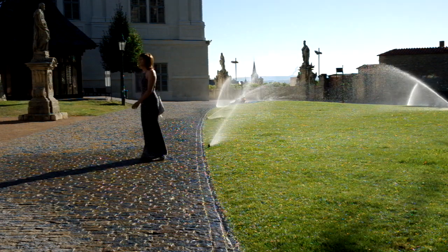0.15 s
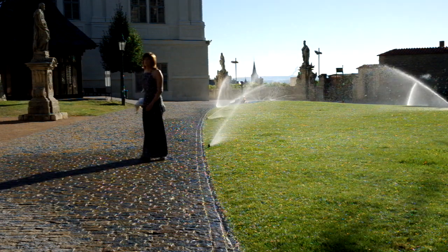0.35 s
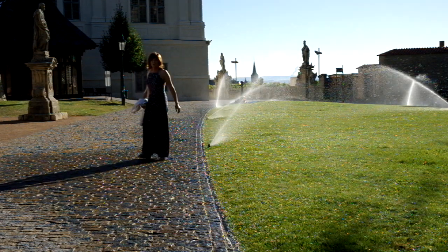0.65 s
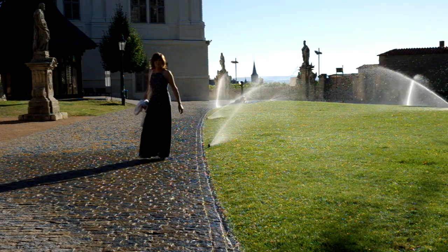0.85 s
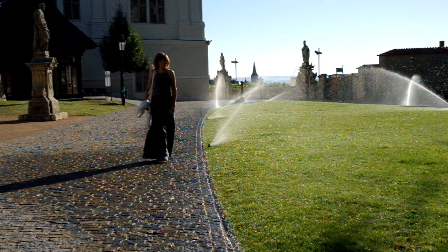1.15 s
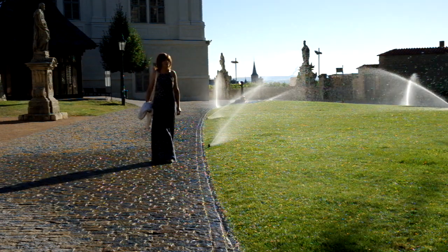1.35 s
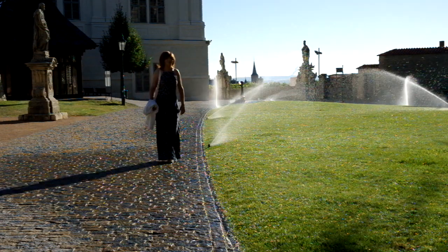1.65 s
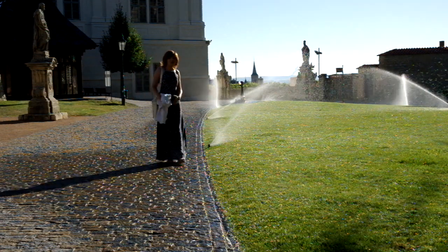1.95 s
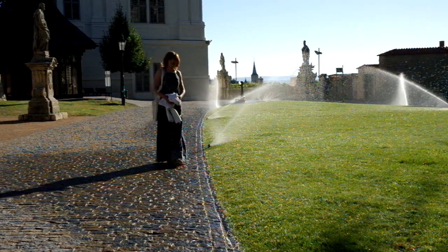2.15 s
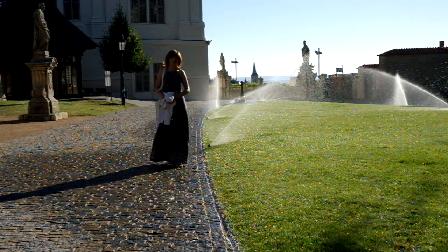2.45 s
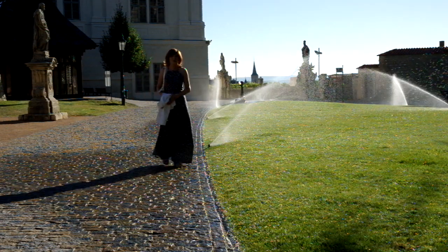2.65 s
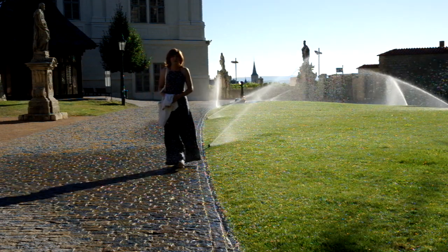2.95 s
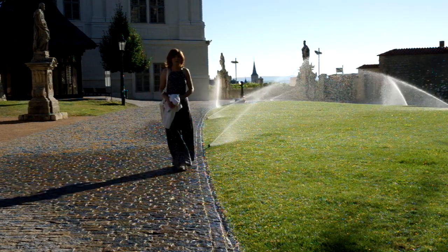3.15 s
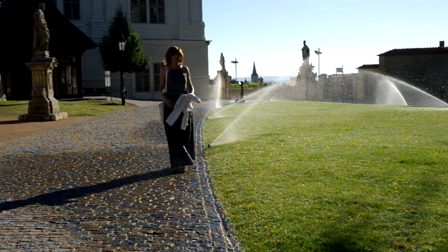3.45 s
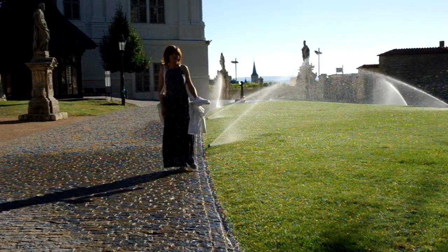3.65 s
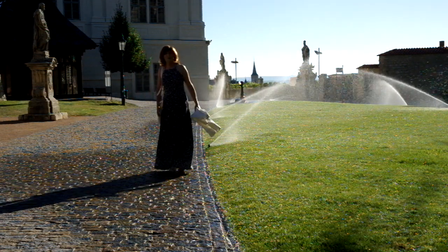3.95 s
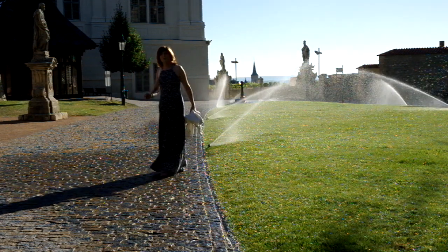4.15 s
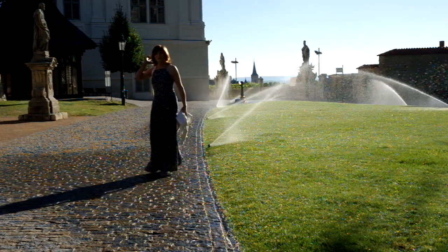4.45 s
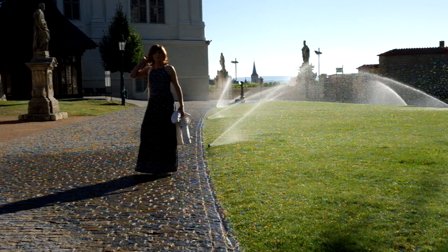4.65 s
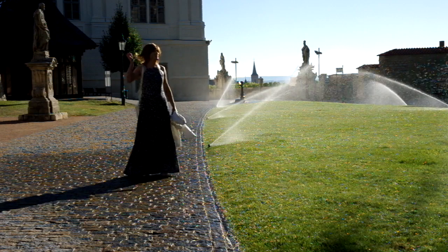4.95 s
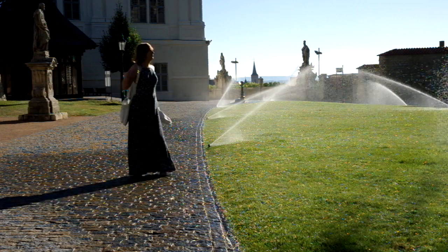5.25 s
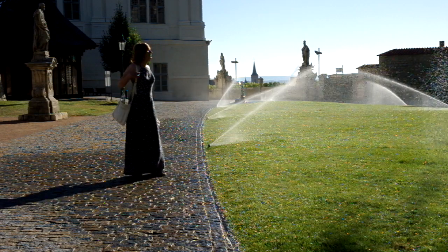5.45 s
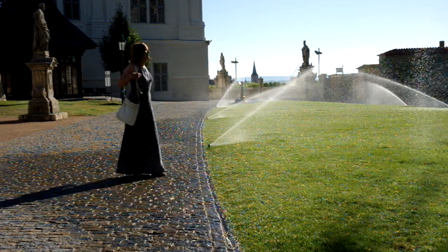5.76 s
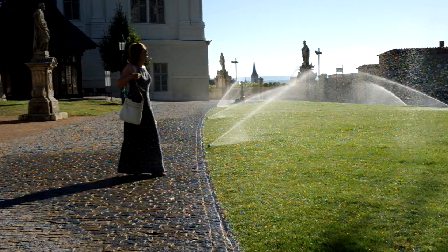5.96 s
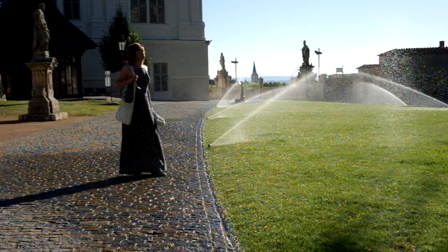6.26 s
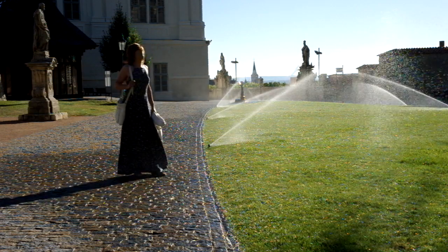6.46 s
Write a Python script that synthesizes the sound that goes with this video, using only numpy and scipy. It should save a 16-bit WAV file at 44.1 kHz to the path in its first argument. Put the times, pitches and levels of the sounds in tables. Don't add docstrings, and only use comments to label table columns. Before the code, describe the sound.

A soft, steady wash of sprinkler spray, airy on top and rougher in the middle, grows very slightly nearer. Over it a bird whistles high, short notes with a slight wall echo, and a pigeon coos with a fluttering throat; both stop by about three seconds. The camera's casing cracks dryly in the grip, snaps hard at 3.3 seconds, then creaks and rubs around five. Faint electronic pulsing and distant rumble remain.

```python
import sys
import numpy as np
from scipy import signal
from scipy.fft import rfft, irfft
from scipy.io import wavfile
from scipy.ndimage import uniform_filter1d

SR = 44100
rng = np.random.default_rng(int(sys.argv[2]) if len(sys.argv) > 2 else 0)


def pcm_store(signal):
    levels = np.round(np.clip(np.atleast_2d(signal), -1, 1) * 32767)
    wavfile.write(sys.argv[1], SR, levels.astype(np.int16).T)


def natural_amplitude(level_db):
    exponent = np.asarray(level_db, float) / 20
    return 10 ** exponent


N = 291942


def unit(x):
    return x / np.sqrt(np.mean(x ** 2) + 1e-20)


def in_time(rows):
    s, *columns = np.transpose(rows)
    return [np.interp(np.arange(N) / SR, s, c) for c in columns]


def band(x, low_hz, high_hz, order=2):
    return signal.sosfilt(signal.butter(order, [low_hz, high_hz], "band", fs=SR, output="sos"), x)


def drift(rate):
    r = np.exp(-40 * np.pi * rate / SR)
    noise = rng.standard_normal(N // 20 + 4002)
    slow = signal.lfilter([1], [1, -2 * r, r * r], noise)[4000:]
    return np.interp(np.arange(N) / 20, np.arange(len(slow)), unit(slow))


def ring(clicks, hz, t60):
    r, w = natural_amplitude(-60 / (t60 * SR)), 2 * np.pi * hz / SR
    return signal.lfilter([0, np.sin(w)], [1, -2 * r * np.cos(w), r * r], clicks + 1e-18)


def clicks(per_s, spread_db):
    sizes = natural_amplitude(spread_db * np.minimum(rng.exponential(1, N), 5)) * rng.choice([-1, 1], N)
    return unit(sizes * (rng.random(N) < per_s / SR))


def coloured(source, spectrum, patchy_db):
    points = np.array(spectrum)
    hz = np.maximum(np.fft.rfftfreq(N, 1 / SR), 1)
    place = np.log(hz / points[0, 0]) / np.log(points[-1, 0] / points[0, 0])
    gain_db = np.interp(np.log(hz), np.log(points[:, 0]), points[:, 1], -90, -90)
    shaped = rfft(source) * natural_amplitude(gain_db)
    together = drift(5.9)
    out = np.zeros(N)
    for k in range(5):
        part = irfft(shaped * np.clip(1 - abs(place * 4 - k), 0, 1), N)
        out += part * natural_amplitude(patchy_db * (0.5 * together + drift(43)))
    return unit(out)


def add(out, start, hz, level_db):
    k, at = np.arange(len(hz)), int(start * SR)
    edges = np.clip(np.minimum(k, k[::-1]) / SR / .002, 0, 1)
    tone = np.sin(2 * np.pi * np.cumsum(hz) / SR)
    out[at:at + len(k)] += np.sqrt(2) * natural_amplitude(level_db) * edges * tone


def cracks(table, t60, below, above, broad):
    decay_s, rise_s = .0017, .0007
    out, t = np.zeros(N), np.arange(512) / SR
    shape = np.exp(-t / decay_s) * np.minimum(t / rise_s, 1)
    for start, level_db, hz in table:
        crack = rng.standard_normal(len(t)) * shape
        ringing = unit(ring(crack, hz, t60))
        scrape = unit(band(crack, hz / below, min(hz * above, 15000)))
        at = int((start - rise_s) * SR)
        out[at:at + len(t)] += natural_amplitude(level_db) * unit(ringing + broad * scrape)
    return out


# (time [s], mist level [dB])
SPRAY_SWING = [
    (0.1, -60.5),
    (1.03, -60.5),
    (2.03, -59.5),
    (2.43, -61),
    (2.99, -59.5),
    (6.5, -59),
]
# (frequency [Hz], density [dB per Hz])
JET_SPECTRUM = [(180, -18.5), (300, -4.5), (420, -2.5), (570, -0.5), (1000, -3), (1700, -6), (3300, -4.5),
                (4000, -10), (4600, -18), (6000, -58)]
# (frequency [Hz], density [dB per Hz])
MIST_SPECTRUM = [(3500, -6.5), (4600, -5), (5500, -2.5), (7000, -1), (9000, -2.5), (10200, -4),
                 (10800, -6.5), (13400, -8)]


def sprinklers():
    mist_db, = in_time(SPRAY_SWING)
    patter = clicks(per_s=1500, spread_db=1.0)
    jets = coloured(rng.standard_normal(N) + 0.53 * patter, JET_SPECTRUM, patchy_db=0.6)
    mist = coloured(rng.standard_normal(N) + 0.12 * patter, MIST_SPECTRUM, patchy_db=0.67)
    jets_db = -58.5 + 0.33 * (mist_db - mist_db.mean())
    return natural_amplitude(jets_db) * jets + natural_amplitude(mist_db + 0.5) * mist


# (frequency [Hz], density [dB per Hz])
RUMBLE_SPECTRUM = [(20, 4.5), (60, -6.5), (100, -9), (160, -5.5), (260, -12.5), (400, -18)]


def rumble():
    return natural_amplitude(-67.5) * coloured(rng.standard_normal(N), RUMBLE_SPECTRUM, patchy_db=-1.5)


# (time [s], level [dB], ring pitch [Hz])
DULL_CREAKS = [(0.3753, -56, 2100), (0.4813, -56, 1400), (0.495, -57, 2930), (0.4975, -48, 1400),
               (0.5005, -51, 2140), (0.504, -51, 1680), (0.5253, -56, 2020), (0.7153, -54, 1600),
               (1.309, -52.5, 1150), (1.3148, -54, 2800), (1.3183, -53, 3300), (1.8723, -57, 2630),
               (1.8783, -51, 2600), (4.151, -57, 3150), (4.1598, -52, 2900), (4.832, -54, 1680),
               (4.8395, -46.5, 3000), (4.8443, -46, 1090), (4.8496, -63, 2370), (4.8573, -53, 2930),
               (4.861, -51.5, 2000), (5.1543, -53, 3530), (5.1923, -54, 1390), (5.262, -55, 2020),
               (5.2798, -49, 1650), (5.2905, -49.5, 1730), (5.3055, -53, 1800), (5.3313, -55, 1900),
               (5.3595, -55, 1640), (5.4076, -55, 2070)]
# (time [s], level [dB], ring pitch [Hz])
BRIGHT_CREAKS = [(0.37, -59, 7970), (0.378, -54, 8400), (0.4812, -47, 8500), (0.4832, -53, 8400),
                 (0.495, -48, 8700), (1.3155, -54, 9000), (1.878, -57, 4200), (4.1598, -54, 8270),
                 (4.8395, -48.5, 5800), (4.8443, -56, 9400), (4.8573, -53, 9100), (5.1406, -51, 10030),
                 (5.1543, -54, 9900), (5.177, -52, 4650), (5.2798, -53, 4300), (5.2905, -49.5, 5760),
                 (5.3595, -53, 10100), (5.4076, -47.5, 8400)]


def creaks():
    dull = cracks(DULL_CREAKS, t60=.008, below=1.55, above=1.5, broad=.9)
    bright = cracks(BRIGHT_CREAKS, t60=0.0077, below=1.36, above=1.25, broad=1.0)
    return natural_amplitude(-6.0) * dull + natural_amplitude(-7.0) * bright


# (frequency [Hz], level [dB], t60 [s])
SHELL_LOW = [(1080, -15, 0.016), (1500, -12, 0.014), (1900, 2.5, 0.011), (2168, 10.5, 0.0055),
             (2980, -1, 0.009), (3420, 1, 0.0086)]
# (frequency [Hz], level [dB], t60 [s])
SHELL_HIGH = [(5800, -3, .0025), (7100, -1, 0.0025), (8400, 10, 0.0015), (10300, 1, 0.0017),
              (11800, 1, 0.0016)]
# (time [s], length [s], low level [dB], low centre [Hz], high level [dB])
FINGER_STROKES = [
    (0.45, 0.061, -63, 3120, -64),
    (5.127, 0.15, -64, 3020, -60),
    (5.27, 0.14, -58.5, 1500, -62),
]


def rubbing():
    attack_s, fade_db = .015, -11
    grains, out, t = clicks(per_s=900, spread_db=4.0), np.zeros(N), np.arange(N) / SR
    for start, length, low_db, low_hz, high_db in FINGER_STROKES:
        edges = np.clip(np.minimum(t - start, start + length - t) / attack_s, 0, 1)
        stroke = edges * natural_amplitude(fade_db * np.clip((t - start) / length, 0, 1))
        for modes, rub_db, rub_hz in ((SHELL_LOW, low_db, low_hz), (SHELL_HIGH, high_db, 8800)):
            for hz, level_db, t60 in modes:
                nearness_db = -14 * abs(np.log2(hz / rub_hz))
                mode_gain = natural_amplitude(rub_db + level_db + nearness_db - 12.0)
                slips = np.roll(grains, int(hz))
                out += ring(mode_gain * stroke * slips, hz, t60)
    return out


# (time [s], level [dB], pitch [Hz], length [s], final fall [Hz])
WHISTLES = [
    (0.738, -54.5, 4860, 0.045, 1250),
    (1.088, -55.5, 4890, .051, 1300),
    (1.42, -56, 4640, .07, 420),
    (1.781, -61, 4630, .11, 29.7),
    (2.136, -59, 4630, 0.096, 110),
    (2.537, -61, 4630, .105, 40),
]
# (time [s], level [dB], from [Hz], to [Hz], length [s])
FLICKS = [
    (1.525, -59, 5730, 3920, 0.018),
    (1.872, -61, 6200, 4650, .022),
    (2.236, -61, 6300, 4350, 0.02),
    (2.641, -61, 5900, 3880, 0.027),
    (2.912, -66, 5700, 4760, .02),
    (2.943, -62.5, 3400, 3530, 0.042),
]


def bird():
    drop_hz, drop_s, lift_s = 1930, .0055, .03
    attack_s, release_s = .007, .012
    out, waver = np.zeros(N), 28 * drift(28)
    for start, level_db, hz, length, fall_hz in WHISTLES:
        t = np.arange(int(length * SR)) / SR
        lift_hz = 230 * min(1, 0.485 + fall_hz / 700)
        pitch = hz + drop_hz * np.exp(-(t / drop_s) ** 1.22)
        pitch += np.interp(t, [lift_s / 2, lift_s, length], [0, lift_hz, lift_hz - fall_hz])
        shape_db = np.interp(t, [0, attack_s, length - release_s, length], [-7, 0, 0, -8])
        catch = np.exp(-((t - .064) / .006) ** 2)
        pitch += waver[int(start * SR):][:len(t)] - 100 * np.sqrt(catch)
        add(out, start, pitch, level_db + shape_db - 11 * catch - 56 * t)
    for start, level_db, from_hz, to_hz, length in FLICKS:
        add(out, start, np.linspace(from_hz, to_hz, int(length * SR)), level_db)
    out = out * natural_amplitude(1.1 * drift(70))
    return out + natural_amplitude(-16) * np.roll(out, int(0.03 * SR))


# (time [s], length [s], level [dB], pitch [Hz], fade [dB])
COOS = [
    (0.793, 0.34, -64, 413, -5.5),
    (1.205, 0.45, -60.5, 426, 0),
    (1.664, 0.37, -57, 422.5, -7.5),
    (2.15, 0.081, -61, 414, -7),
]


def pigeon():
    out, t = np.zeros(N), np.arange(N) / SR
    wobble, flutter = drift(84.5), drift(13.3)
    throb = 1 + .9 * np.sin(2 * np.pi * np.cumsum(36 * (1 + .35 * flutter)) / SR)
    rasp = 0.79 * unit(band(rng.standard_normal(N), 358, 510))
    for start, length, level_db, hz, fade_db in COOS:
        edges = np.clip(np.minimum(t - start, start + length - t) / 0.012, 0, 1)
        tone = np.sin(2 * np.pi * np.cumsum(hz * (1 + 0.0402 * wobble)) / SR)
        phrase_db = level_db - 0.5 + fade_db * np.clip((t - start) / length, 0, 1)
        out += natural_amplitude(phrase_db) * edges * (tone * throb + rasp)
    return band(out * natural_amplitude(1.3 * drift(30)), 280, 620)


# (time [s], peak level [dB], sign and size)
SNAPS = [
    (1.3128, -36, -1.1),
    (1.878, -44, 1),
    (3.2928, -30.5, -1.2),
    (4.1614, -43, 1),
    (4.1505, -47, 1),
    (5.263, -36, 0.92),
    (5.2812, -41, -1),
    (5.3316, -44, -1),
]


def snaps():
    out = np.zeros(N)
    for start, peak_db, sign in SNAPS:
        out[int(start * SR)] = sign * natural_amplitude(peak_db + 6)
    return band(out, 900, 5800, order=1)


# (time [s], peak level [dB], pitch [Hz])
BUMPS = [(1.905, -50.5, 75), (2.036, -45.5, 86), (2.35, -58, 70), (2.41, -57, 90), (4.15, -53, 99),
         (4.378, -55, 34.4), (4.414, -49, 64.4), (4.433, -43, 61), (4.461, -59, 60), (5.153, -52, 70),
         (5.3, -58, 90.5)]


def bumps():
    out, t = np.zeros(N), np.arange(int(.09 * SR)) / SR
    for start, peak_db, hz in BUMPS:
        at = int((start - .004) * SR)
        swing = np.sin(2 * np.pi * hz * t) * np.exp(-t * hz / 0.31)
        out[at:at + len(t)] -= natural_amplitude(peak_db + 6.5) * swing
    return out


def scene():
    surroundings = sprinklers() + rumble() + bird() + pigeon()
    handling = creaks() + rubbing() + snaps() + bumps()
    return (surroundings + handling)[None]


def electrical_pulses():
    period, start, length = 1323, 887, 114
    phase = (np.arange(N) - start) % period
    pulse = uniform_filter1d(1. * (phase < length), size=22)
    return natural_amplitude(-56.0) * (pulse - pulse.mean())


def weak_band_dropout(x, low_hz, high_hz, keep_db):
    sos = signal.butter(3, [low_hz, high_hz], "band", fs=SR, output="sos")
    part = signal.sosfiltfilt(sos, x)
    blocks = part[0, :N // 1024 * 1024].reshape(-1, 1024)
    kept = np.sqrt(np.mean(blocks ** 2, axis=1)) > natural_amplitude(keep_db)
    gate = np.interp(np.arange(N), np.arange(len(kept)) * 1024 + 512, kept)
    return x - .85 * part * (1 - gate)


def roll_off(x):
    return signal.sosfilt(signal.butter(12, 13760, fs=SR, output="sos"), x)


def record(dry):
    x = dry + electrical_pulses()
    x = signal.sosfilt(signal.cheby2(20, 60, 13250, fs=SR, output="sos"), x)
    x = weak_band_dropout(x, 100, 180, keep_db=-69.5)
    return roll_off(x - .0446)


dry = scene()
out = record(dry)
pcm_store(out)
```